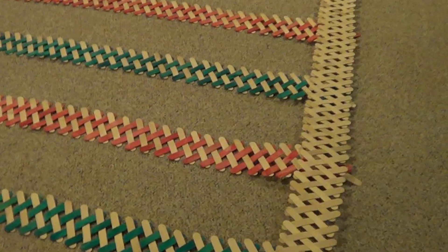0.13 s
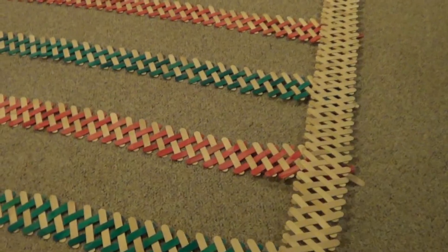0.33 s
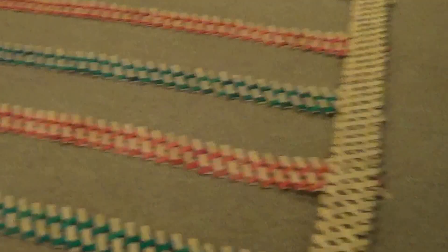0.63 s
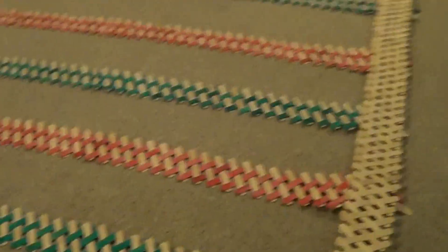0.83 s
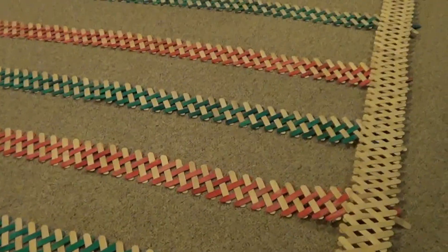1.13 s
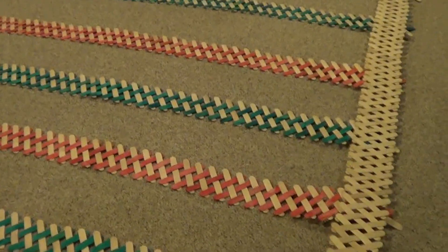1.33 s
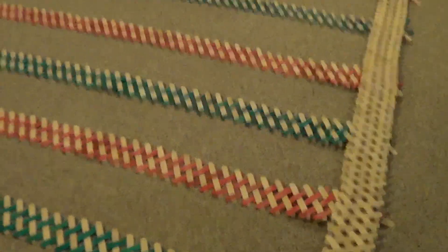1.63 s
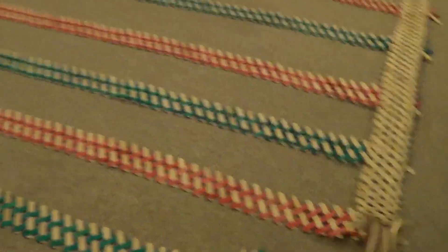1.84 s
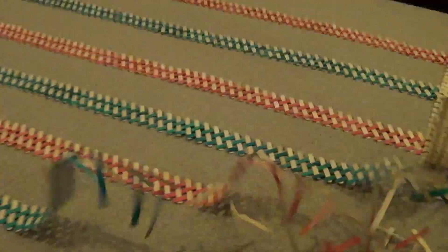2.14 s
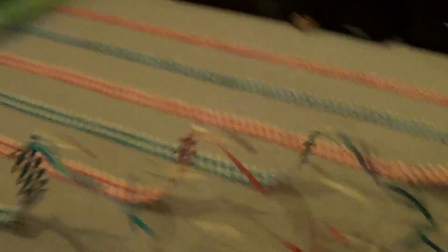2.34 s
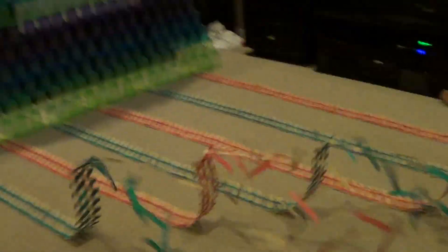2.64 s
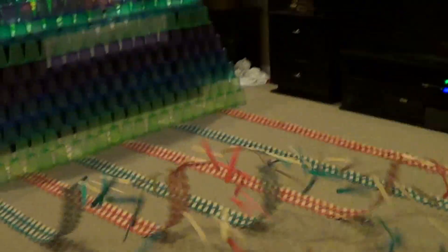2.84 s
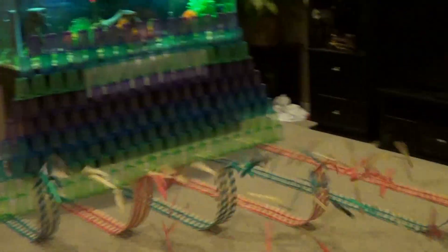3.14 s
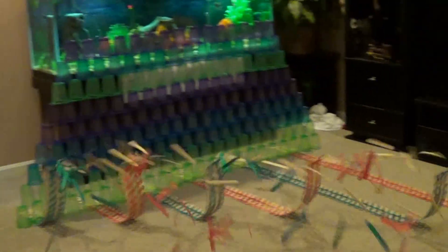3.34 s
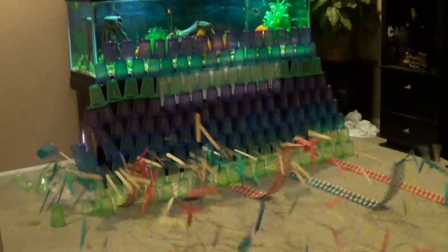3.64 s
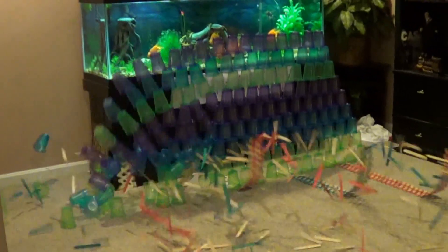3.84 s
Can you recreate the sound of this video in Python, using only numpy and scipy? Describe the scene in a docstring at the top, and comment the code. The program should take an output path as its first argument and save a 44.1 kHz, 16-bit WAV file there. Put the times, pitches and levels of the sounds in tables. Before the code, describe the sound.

Flat wooden sticks snap loose and clatter rapidly over carpet after a few small close knocks.

```python
"""A quiet, humming, carpeted room, where a woven chain of wooden craft sticks lets go.
After a few close knocks, made of swelling modes and noise ticks, the weave snaps apart: a dense bright
clatter of stick on stick, each clack a rough contact with bending modes, over soft damped thuds on carpet.
Near the end the sticks reach a wall of plastic cups, whose ringing modes knock hollowly as they start
to fall. Gain control holds the loud part down."""
import sys
import numpy as np
from scipy import signal
from scipy.fft import rfft, irfft
from scipy.io import wavfile
from scipy.ndimage import uniform_filter1d

SR = 44100
rng = np.random.default_rng(int(sys.argv[2]) if len(sys.argv) > 2 else 0)


def int16_out(signal):
    """Quantize to a 16-bit WAV file."""
    q = np.round(np.clip(np.atleast_2d(signal).T, -1, 1) * 32767)
    wavfile.write(sys.argv[1], SR, q.astype(np.int16))


N = 176400
T = np.arange(N) / SR
RING_T = T[:2048]


def amp(db):
    """Decibels to gain."""
    return 10 ** (np.asarray(db) / 20)


def evened(x):
    """Scales to rms 1."""
    return x / np.sqrt(np.mean(x ** 2) + 1e-20)


def read(points, hz):
    """Reads a curve on a log-frequency axis."""
    f, value = np.transpose(points)
    return np.interp(np.log(hz + 1), np.log(f), value)


def level(points):
    """Gain over time from a curve in dB, silent before it begins."""
    return amp(np.interp(T, *np.transpose(points), left=-np.inf))


def add(mix, start_s, sound):
    """Mixes a sound in at a time."""
    part = mix[round(start_s * SR):][:len(sound)]
    part += sound[:len(part)]


def colour(x, points, size=4096):
    """Causal minimum-phase filter with the given spectrum."""
    hz = abs(np.fft.fftfreq(size, 1 / SR))
    log_gain = np.log(amp(read(points, hz)))
    spectrum = np.exp(np.conj(signal.hilbert(log_gain)))
    taps = np.fft.ifft(spectrum).real[:size // 2]
    return signal.oaconvolve(np.atleast_2d(x), taps[None], axes=1)[:, :N]


def low_cut(x, hz):
    """Small things radiate little bass: second-order high-pass."""
    return signal.sosfilt(signal.butter(2, hz, "high", fs=SR, output="sos"), x)


def decay(t, t60):
    """Exponential fall of 60 dB in t60 seconds."""
    return np.exp(-np.log(1000) * t / t60)


def ring(modes, scale=1):
    """Damped modes after one blow."""
    out = np.zeros(len(RING_T))
    for hz, db, t60 in modes:
        out += amp(db) * decay(RING_T, t60) * np.sin(2 * np.pi * hz * scale * RING_T)
    return out


PAN_SPREAD = 0.068  # largest gain offset per side


def shower(shapes, per_s, spread_db):
    """Random blows of uneven strength, at a steady or changing rate; each shape has its own place."""
    out = np.zeros((2, N))
    draws = rng.random((16000, 3))
    expected = np.cumsum(per_s * np.ones(N)) / SR
    arrivals = np.cumsum(-np.log(1 - draws[:, 0]))  # exponential gaps
    times = np.searchsorted(expected, arrivals) / SR
    pans = rng.permutation(np.linspace(-1, 1, len(shapes))) * PAN_SPREAD
    for start_s, (_, size, pick) in zip(times[times < N / SR], draws):
        k = int(pick * len(shapes))
        blow = shapes[k] * amp(spread_db * min(-np.log(1 - size), np.pi))
        add(out[0], start_s, blow * (1 - pans[k]))
        add(out[1], start_s, blow * (1 + pans[k]))
    return out


STICK_HZ, STICK_T60_S = 427.5, 0.023  # mean lowest mode, decay
RING_DB = -15.5  # modes against contact noise


def clack(contact_s, count=8):
    """A brief rough contact, then the bending modes of one flat stick."""
    t = RING_T[:700]
    ratios = ((2 * np.arange(1, count + 1) + 1) / 3) ** 2  # free bar
    hz = STICK_HZ * rng.uniform(.7, 1.3) * ratios
    strengths = rng.standard_normal(count) * (hz < SR / 2)
    modes = strengths @ np.sin(2 * np.pi * hz[:, None] * t)
    contact = rng.standard_normal(len(t)) * np.exp(-t / contact_s)
    sound = contact + amp(RING_DB) * modes * decay(t, STICK_T60_S)
    return sound / np.linalg.norm(sound)


# Strength of the clatter. Each row: time in seconds, level in dB before the collapse gain.
CLATTER = [(1.42, -68), (1.5, -52), (1.555, -43), (1.574, -33), (1.598, -36), (1.643, -31), (1.655, -19.5),
           (1.78, -14), (1.92, -12), (2.1, -13), (2.3, -10), (3.0, -10.5), (4.0, -8)]
# Colour of stick on stick. Each row: frequency in Hz, gain in dB.
STICK_COLOUR = [(150, -29), (500, -16.5), (1300, -18.5), (2000, -11), (2600, -13.5), (3500, -7.5),
                (4900, -7.5), (6400, -7), (8000, -3.5), (9200, 1), (10000, -1.5), (11200, 0), (12500, -6.5),
                (15500, -13.5)]
# Density of collisions. Each row: time in seconds, clacks per second.
CLACK_RATE = [(1.5, 2030), (1.7, 755), (2.05, 1012), (2.4, 2400), (3.5, 3980)]
CONTACT_S, CLACK_SPREAD_DB = 0.00051, 1.43
RELEASES_PER_S, BUNCH_DB, BUNCH_S = 170, -4, 0.0093


def sticks(count=600):
    """Dense stick collisions, whose level surges each time the weave releases another stick."""
    releases = rng.random(N) < RELEASES_PER_S / SR
    surges = signal.lfilter([1], [1, -np.exp(-1 / (BUNCH_S * SR))], releases)
    bunches = np.sqrt(1 + amp(BUNCH_DB) ** 2 * surges)
    rate = np.interp(T, *np.transpose(CLACK_RATE))
    clacks = [clack(CONTACT_S) for _ in range(count)]
    stream = shower(clacks, rate, CLACK_SPREAD_DB) / np.sqrt(rate)  # density alone keeps the level
    return evened(colour(stream * bunches, STICK_COLOUR)) * level(CLATTER)


# Sticks springing free. Each row: start in seconds, relative level in dB, dullness from 0 to 1.
SNAPS = [(1.462, -26, 0.3), (1.532, -11, 0.4), (1.562, -9, 0.4), (1.573, -7, 0.1), (1.5875, -7, 0.6),
         (1.6037, -1.5, 0.46), (1.6464, 4, 0.2), (1.664, 1, 0.1), (1.6724, 10, 0), (1.68, 13, 0),
         (1.696, 12.5, 0), (1.7072, 10, 0), (1.7168, 8, 0), (1.727, 2, 0), (1.76, 3, 0.2),
         (1.7711, 14.5, 0.3), (1.778, 15.5, 0.5), (1.7857, 14.5, 0.9), (1.7973, 4, 0), (1.807, 13.5, 0),
         (1.8128, 10, 0), (1.8286, 13, 0.75), (1.8464, 15.5, 0.53), (1.8648, 8, 0.3), (1.888, 13, 0.83),
         (1.9046, 10, 0.5), (1.9487, 13, 0.54), (1.9846, 3, 0), (1.9997, 7, 0), (2.0255, 14, 0.16),
         (2.0807, 4, 0), (2.1153, 11.5, .2), (2.197, 11.5, 0.55), (2.2944, 14.5, 0.2), (2.4608, 7, 0.4)]
# Colour of a dull, flat-on slap of wood. Each row: frequency in Hz, gain in dB.
SLAP_COLOUR = [(150, 5), (700, -11), (1300, -10.5), (2000, -2.5), (2700, -10), (4000, -1), (6000, -12),
               (10000, -1), (15500, -32)]
SNAP_CONTACT_S = .0019


def snaps(snap_db=6.5):
    """Single sticks spring out of the weave, edge-on and bright or flat-on and dull."""
    bright, dull = np.zeros(N), np.zeros(N)
    for start_s, db, dullness in SNAPS:
        snap = amp(db + snap_db) * clack(SNAP_CONTACT_S)
        share = np.clip(dullness, 0, 1)
        add(bright, start_s, (1 - share) * snap)
        add(dull, start_s, share * snap)
    return low_cut(colour(bright, STICK_COLOUR) + colour(dull, SLAP_COLOUR), hz=250)


THUD_CYCLES = 0.85  # peak comes at half this many cycles


def thud(hz):
    """A push on the carpet that dies within a cycle or two."""
    cycles = hz * RING_T
    u = 2 * cycles / THUD_CYCLES
    return np.sin(2 * np.pi * cycles) * np.e * u * np.exp(-u)


# Heavy landings. Each row: start in seconds, level in dB before colour and collapse gain, pitch in Hz.
THUDS = [(1.70, -17.5, 474), (1.736, -17, 550), (1.754, -13.5, 400), (1.774, -11.5, 530),
         (1.793, -13.5, 404), (1.8735, -9, 500), (1.883, -8.5, 423), (1.931, -14, 326), (1.94, -13.5, 400),
         (2.016, -14, 307), (2.032, -11, 376), (2.124, -15, 436), (2.17, -12.5, 328), (2.184, -10.5, 340),
         (2.221, -10.5, 475), (2.379, -10.5, 425), (2.472, -6, 440), (2.511, -12, 503), (2.987, -11, 340),
         (3.101, -12, 370), (3.185, -9.5, 288), (3.373, -9, 503), (3.387, -12, 377), (3.424, -13.5, 363),
         (3.47, -13, 310)]
# Lighter landings. Each row: time in seconds, level in dB before the collapse gain.
LANDINGS = [(1.5, -57), (1.68, -49), (1.8, -46), (1.95, -27.5), (2.1, -40.5), (2.2, -28), (2.65, -24.5),
            (2.9, -26.5), (3.4, -25), (4.0, -20.5)]
# Colour of the carpet. Each row: frequency in Hz, gain in dB.
CARPET_COLOUR = [(40, -32), (110, -12), (260, 1.5), (450, -2), (900, 3), (2000, -6), (8000, -62)]
THUD_HZ, THUDS_PER_S, THUD_SPREAD_DB = 362, 600, 3


def carpet():
    """Stick ends kick and land on the floor."""
    heavy = np.zeros(N)
    for start_s, db, hz in THUDS:
        add(heavy, start_s, amp(db) * thud(hz))
    shapes = [thud(THUD_HZ * k) for k in np.geomspace(.6, 2.8, 24)]
    light = shower(shapes, THUDS_PER_S, THUD_SPREAD_DB)
    return colour(heavy, CARPET_COLOUR) + evened(colour(light, CARPET_COLOUR)) * level(LANDINGS)


# Sticks striking cups. Each row: time in seconds, level in dB before low cut and collapse gain.
CUP_STRIKES = [(3.1, -51), (3.24, -18), (3.325, -35), (3.345, -17.5), (3.39, -18.5), (3.405, -32),
               (3.55, -38), (3.65, -23), (3.88, -28), (3.97, -13.5), (4.0, -21)]
# Tumbling cups. Each row: time in seconds, level in dB before low cut and collapse gain.
CUP_FALLS = [(3.1, -39), (3.37, -24), (3.43, -40), (3.6, -24.5), (3.68, -17.5), (3.78, -21), (3.91, -20),
             (3.98, -17)]
# Modes of the cup wall. Each row: nominal frequency in Hz, level in dB, t60 in seconds.
CUP_WALL = [(1155, -6, 0.015), (1670, 2, 0.011), (2206, 2, 0.023), (3200, 1, 0.021)]
# Modes of the cup hollow. Each row: nominal frequency in Hz, level in dB, t60 in seconds.
CUP_HOLLOW = [(510, -2, 0.033), (758.3, 1, 0.048), (915, -2, 0.033)]
CUP_LOW_HZ = 380


def cup_set(modes, low, high):
    """Cups of slightly different pitch, each of random polarity."""
    return [rng.choice([-1, 1]) * ring(modes, k) for k in np.linspace(low, high, 24)]


def cups():
    """Sticks rattle on thin plastic walls; loosened cups knock together."""
    walls = shower(cup_set(CUP_WALL, .8, 1.2), per_s=900, spread_db=4.5)
    hollows = shower(cup_set(CUP_HOLLOW, .86, 1.14), per_s=600, spread_db=2.5)
    both = evened(walls) * level(CUP_STRIKES) + evened(hollows) * level(CUP_FALLS)
    return low_cut(both, CUP_LOW_HZ)


# Modes of a knock. Each row: multiple of its pitch, level in dB, time to peak in seconds.
KNOCK_MODES = [(.52, -18, 0.0023), (1, -3, 0.0014), (1.55, -2.5, 0.00092), (2.13, -6, 0.0014)]


def knock(hz, bright_db):
    """Modes that swell and die; a harder knock lifts the upper ones."""
    out = np.zeros(len(RING_T))
    for ratio, db, swell_s in KNOCK_MODES:
        u = RING_T / swell_s
        gain = amp(db + bright_db * (ratio > np.sqrt(2)))
        out += gain * u * np.exp(1 - u) * np.sin(2 * np.pi * ratio * hz * RING_T)
    return out


# Close knocks. Each row: start in seconds, body gain in dB, tick gain in dB, body pitch in Hz,
# brightness in dB.
KNOCKS = [(0.638, -35, -52, 540, -4), (0.7315, -19.5, -21.5, 1065, -0.5), (0.7385, -28, -38, 1040, -8),
          (0.7405, -31, -42, 533, -14), (.7455, -29, -56, 340, -13), (0.7575, -44, -27, 2600, -6),
          (0.7645, -46, -22, 2700, -4), (.7755, -22.5, -19, 1130, -17), (0.799, -22, -28, 1040, -7),
          (0.8122, -24, -29, 1050, -14), (0.8318, -29, -26.5, 1700, -10)]
# Colour of the ticks. Each row: frequency in Hz, gain in dB.
TICK_COLOUR = [(300, -10), (2000, 6.5), (5000, 4), (8000, -6.5), (11000, -1), (16000, -21)]
# Faint scrapes. Each row: start in seconds, length in seconds, level in dB, centre in Hz, width in Hz.
SCRAPES = [(0.677, 0.063, -53.5, 5200, 600), (0.734, 0.066, -47, 4500, 2000),
           (0.775, 0.069, -45.5, 8500, 5030), (1.079, 0.21, -60, 2450, 130)]
KNOCK_RISE_S, TICK_DECAY_S = 0.00043, 0.0017


def handling():
    """Small close knocks, each a ringing body and a noise tick, with scrapes of band-limited noise."""
    bodies, ticks = np.zeros(N), np.zeros(N)
    tick_shape = (1 - np.exp(-RING_T / KNOCK_RISE_S)) * np.exp(-RING_T / TICK_DECAY_S)
    for start_s, body_db, tick_db, hz, bright_db in KNOCKS:
        add(bodies, start_s, amp(body_db) * knock(hz, bright_db))
        add(ticks, start_s, amp(tick_db) * tick_shape * rng.standard_normal(len(RING_T)))
    bin_hz = np.fft.rfftfreq(N, 1 / SR)
    for start_s, length_s, db, hz, width_hz in SCRAPES:
        band = 1 / (1 + (2 * (bin_hz - hz) / width_hz) ** 2)
        rub = evened(irfft(rfft(rng.standard_normal(N)) * band))
        swell = np.hanning(int(length_s * SR))
        add(bodies, start_s, amp(db) * swell * rub[:len(swell)])
    return low_cut(bodies + colour(ticks, TICK_COLOUR), hz=260)


# Echo decay. Each row: frequency in Hz, t60 in seconds.
ROOM_T60 = [(200, 0.05), (1000, 0.57), (4000, 0.8), (14000, 1.55)]
# Echo level. Each row: frequency in Hz, gain in dB.
ROOM_DB = [(100, -19.5), (350, 2.5), (1500, -5.5), (4500, -2.5), (9000, -5.5), (14000, -18)]


def room(x, count=5, size=256):
    """Diffuse echo, each band dying at its own speed; successive blows echo from different places."""
    place = (T * 30) % count  # crossfades through the tails, 30 per second
    echo = np.zeros((2, N))
    for k in range(count):
        share = np.sqrt(np.maximum(1 - abs((place - k + 1) % count - 1), 0))
        hz, t, z = signal.stft(rng.standard_normal((2, SR // 2)), SR, nperseg=size)
        fading = z * decay(t, read(ROOM_T60, hz)[:, None])
        tail = signal.istft(fading, SR, nperseg=size)[1]
        tail *= np.minimum(T[:tail.shape[1]] / 0.0027, 1)  # onset in seconds
        tail /= np.linalg.norm(tail[0])
        echo += signal.oaconvolve((share * x.mean(0))[None], tail, axes=1)[:, :N]
    return colour(echo, ROOM_DB)


# Mains hum. Each row: frequency in Hz, rms level in dB before gain control.
HUM = [(60, -59.5), (120, -50), (360, -61), (420, -60), (480, -65), (720, -63.5)]
# Colour of the room air. Each row: frequency in Hz, relative level in dB.
AIR_COLOUR = [(24, -25), (40, -16), (123, -9), (309, -10), (577, -13.5), (949, -13), (1600, -20.5),
              (2450, -19.5), (15500, -31)]
# Left-right likeness of the air. Each row: frequency in Hz, coherence from 0 to 1.
AIR_COHERENCE = [(180, 0.96), (550, 0.55), (1650, 0.29), (4970, 0.2), (15000, 1)]
AIR_DB = -51.5


def background():
    """Mains hum as steady sines over the soft air of the room, a partly shared stereo noise."""
    hum = np.zeros(N)
    for hz, db in HUM:
        hum += amp(db) * np.sqrt(2) * np.sin(2 * np.pi * (hz * T + rng.random()))
    a, b = rfft(colour(rng.standard_normal((2, N)), AIR_COLOUR))
    same = np.clip(read(AIR_COHERENCE, np.fft.rfftfreq(N, 1 / SR)), 0, 1)
    air = irfft(np.array([a, same * a + np.sqrt(1 - same ** 2) * b]), N)
    return hum + amp(AIR_DB) * evened(air)


COLLAPSE_DB = 3  # against the knocks and background
CLOSE_RIGHT_DB = 1.6  # right over left, as for all *_right_db


def scene(right_db=0.16, echo_right_db=4.0, low_right_db=1.5, close_echo_db=-10):
    """The collapse lies a little to the right; the knocks are close and nearly dry."""
    right = np.array([[-.5], [.5]])
    wood = amp(COLLAPSE_DB) * (sticks() + snaps())
    low = amp(COLLAPSE_DB) * (carpet() + cups())
    close = handling()
    direct = wood * amp(right * right_db) + low * amp(right * low_right_db)
    direct = direct + close * amp(right * CLOSE_RIGHT_DB)
    echo = room(wood + low + amp(close_echo_db) * close) * amp(right * echo_right_db)
    return direct + echo + background()


LIMIT_DB, RATIO, RECOVER_DB_PER_S = -18.5, 5.48, 3
START_S, EDGE_HZ = 0.13, 15750


def record(dry):
    """Gain control holds the clatter down and ducks the hum; sound fades in after a moment; low-pass."""
    power = abs(uniform_filter1d((dry ** 2).mean(0), size=600))
    power_db = 10 * np.log10(power + 1e-12)
    fall_db = T * RECOVER_DB_PER_S
    peak_db = np.maximum.accumulate(power_db + fall_db) - fall_db  # instant rise, slow recovery
    over_db = np.maximum(peak_db - LIMIT_DB, 0)
    cut_db = (1 - 1 / RATIO) * uniform_filter1d(over_db, size=200)
    opening = np.clip((T - START_S) / 0.028, 0, 1)
    held = dry / amp(cut_db) * opening
    low_pass = signal.firwin(511, EDGE_HZ, window=("kaiser", 9), fs=SR)
    return signal.oaconvolve(held, low_pass[None], "same")


dry = scene()
out = record(dry)
int16_out(out)
```